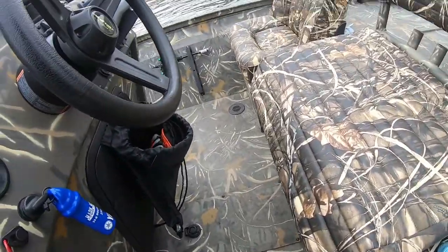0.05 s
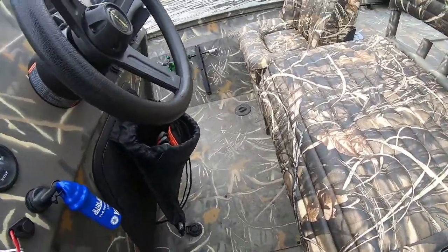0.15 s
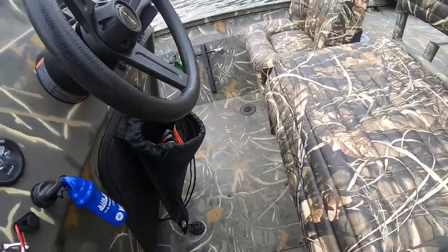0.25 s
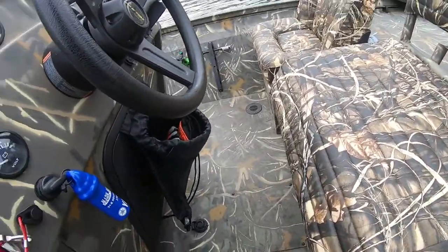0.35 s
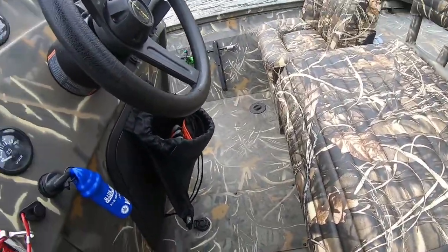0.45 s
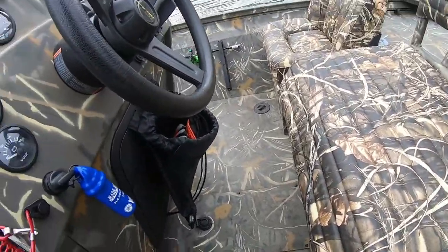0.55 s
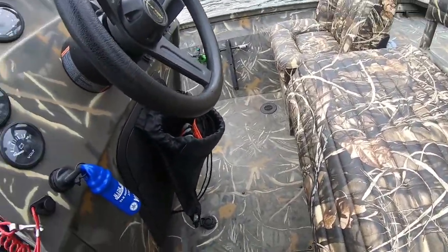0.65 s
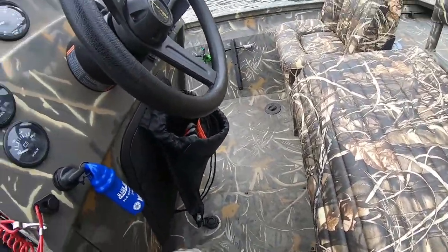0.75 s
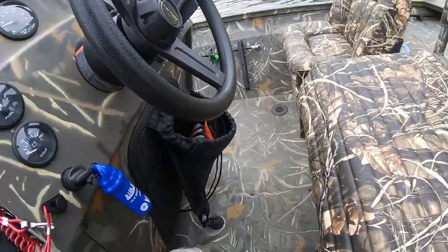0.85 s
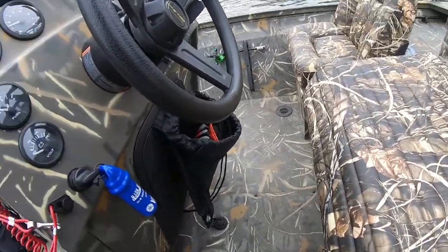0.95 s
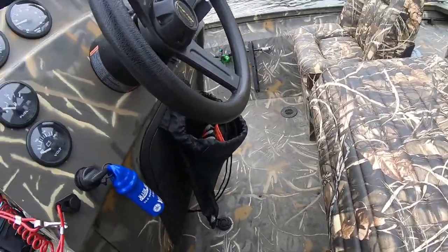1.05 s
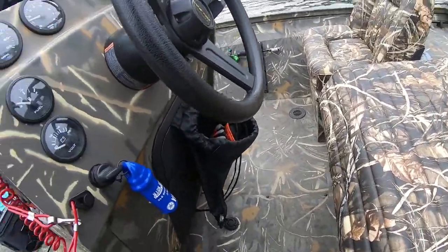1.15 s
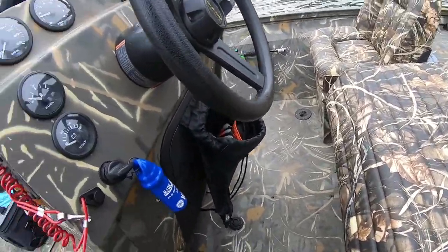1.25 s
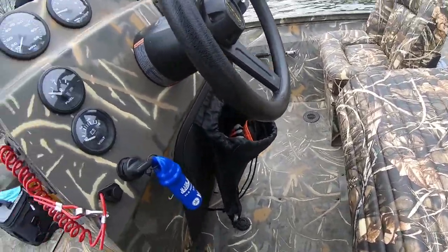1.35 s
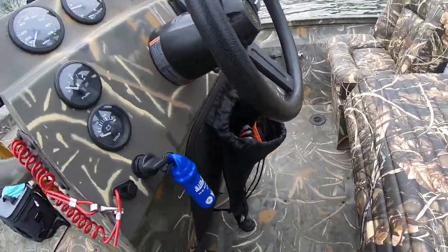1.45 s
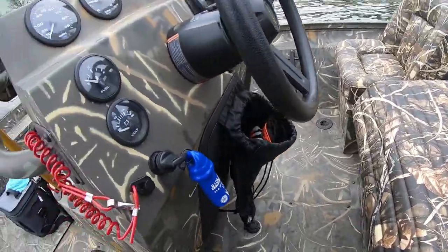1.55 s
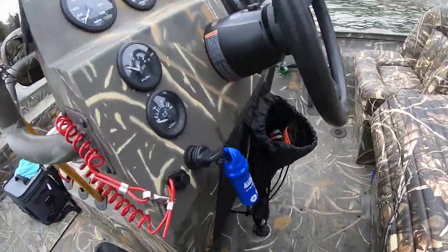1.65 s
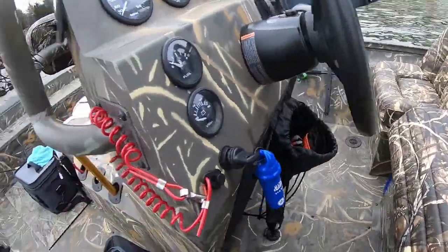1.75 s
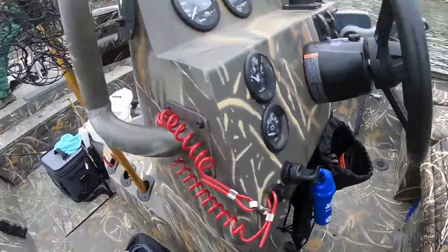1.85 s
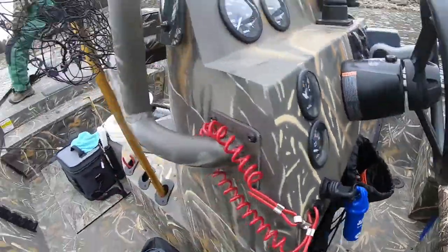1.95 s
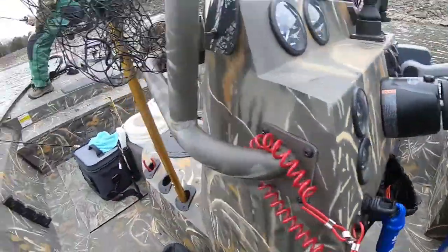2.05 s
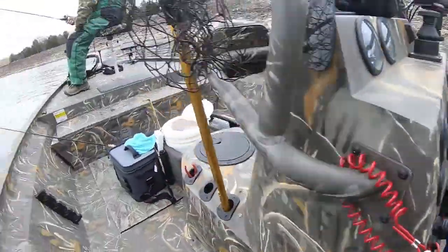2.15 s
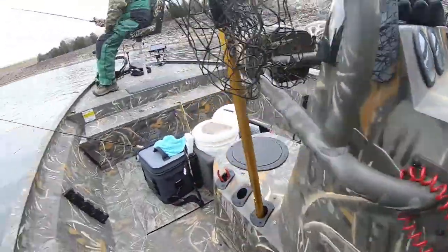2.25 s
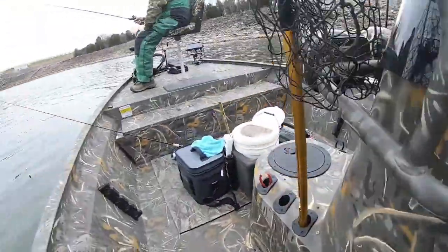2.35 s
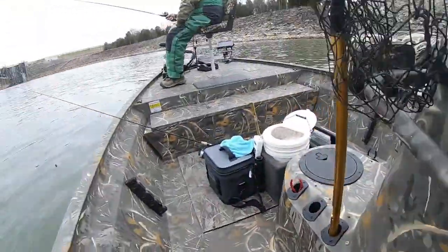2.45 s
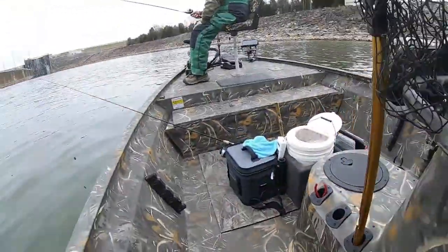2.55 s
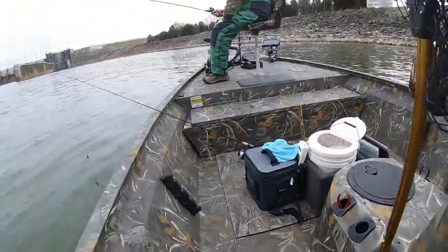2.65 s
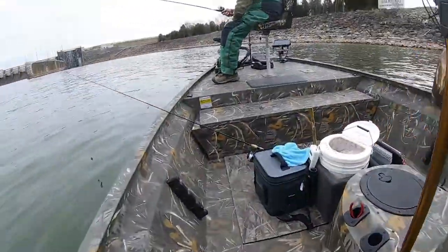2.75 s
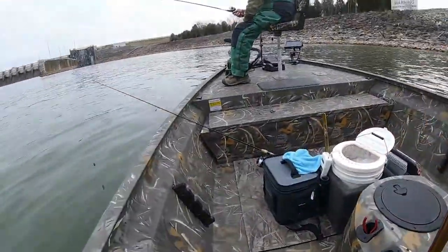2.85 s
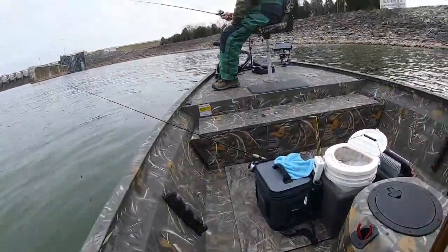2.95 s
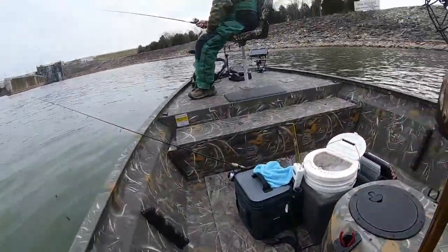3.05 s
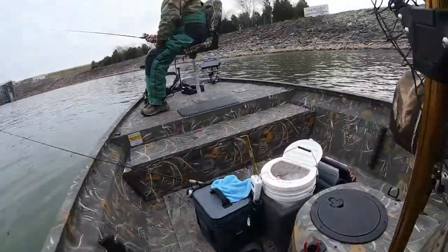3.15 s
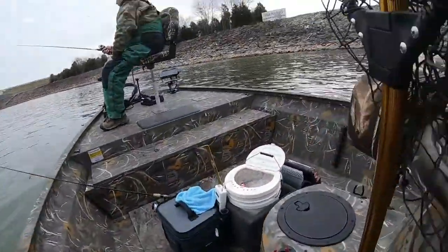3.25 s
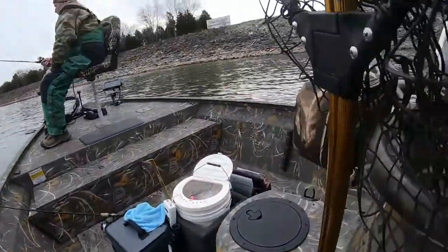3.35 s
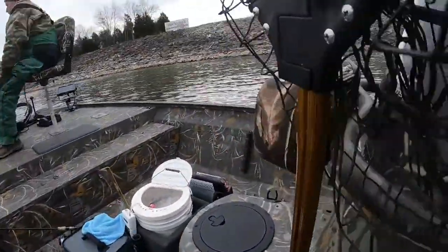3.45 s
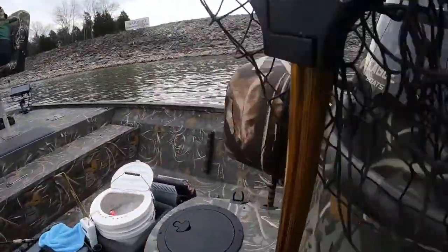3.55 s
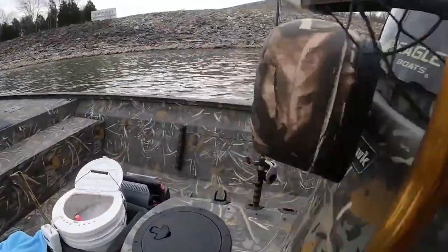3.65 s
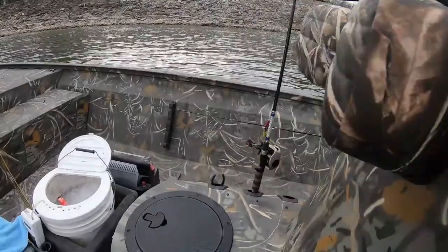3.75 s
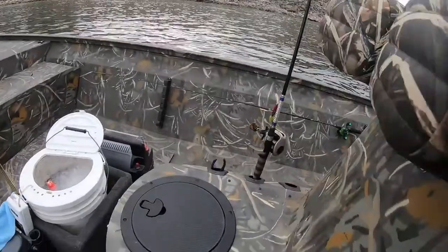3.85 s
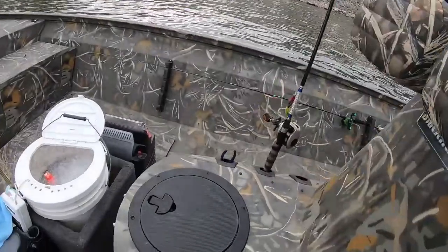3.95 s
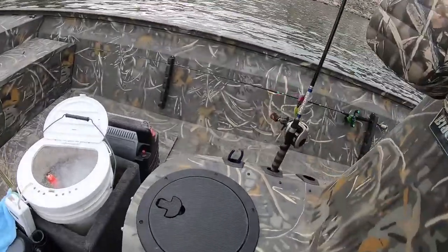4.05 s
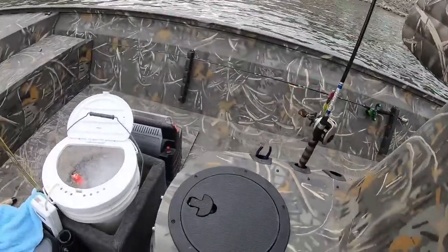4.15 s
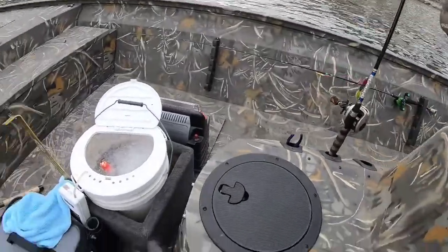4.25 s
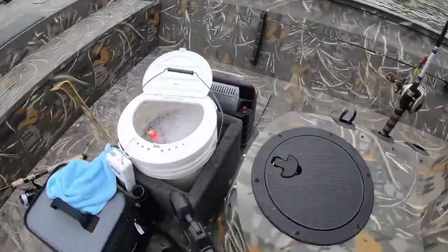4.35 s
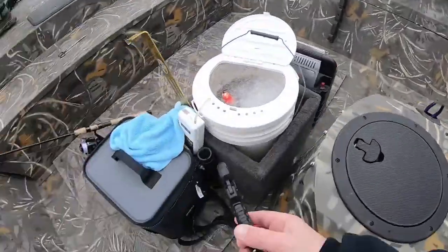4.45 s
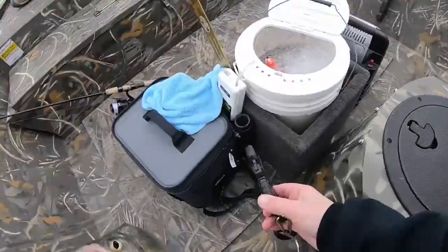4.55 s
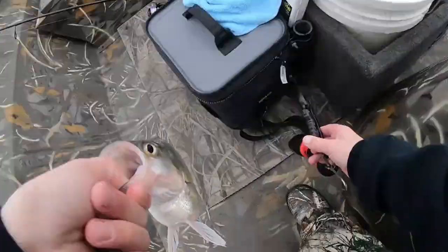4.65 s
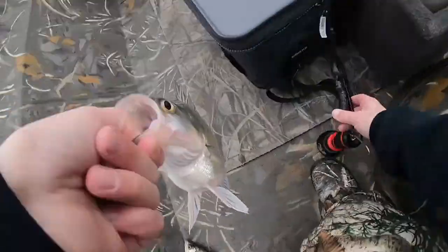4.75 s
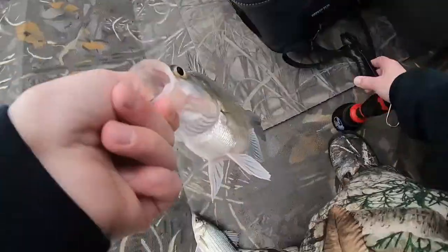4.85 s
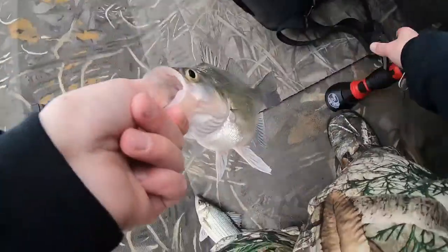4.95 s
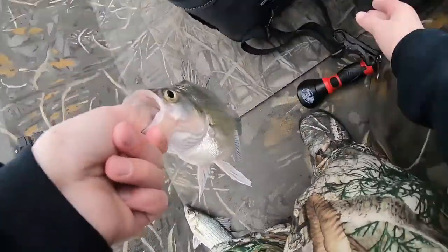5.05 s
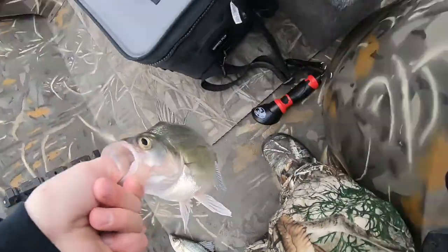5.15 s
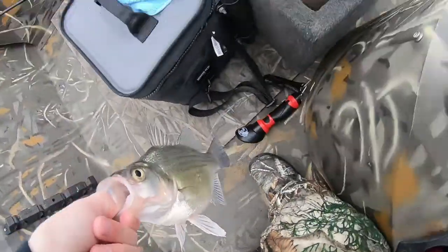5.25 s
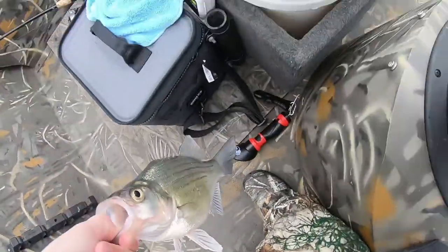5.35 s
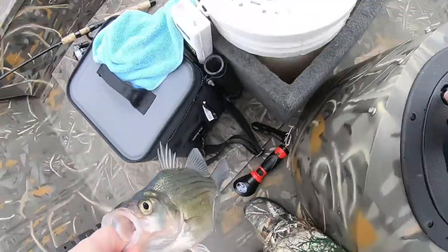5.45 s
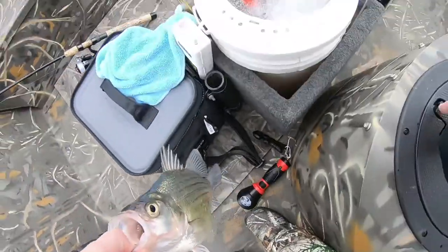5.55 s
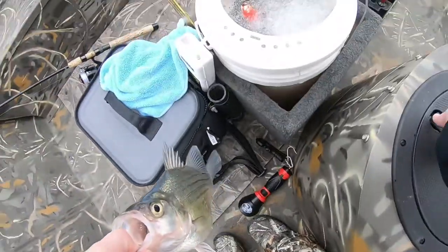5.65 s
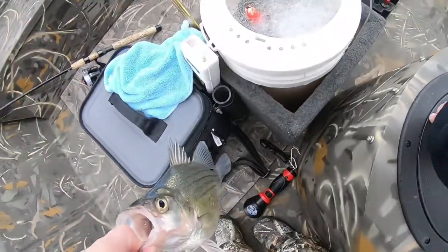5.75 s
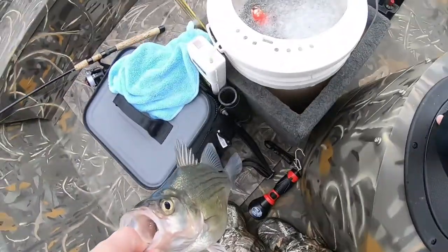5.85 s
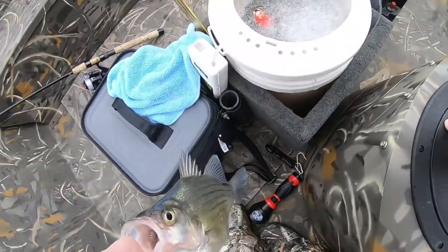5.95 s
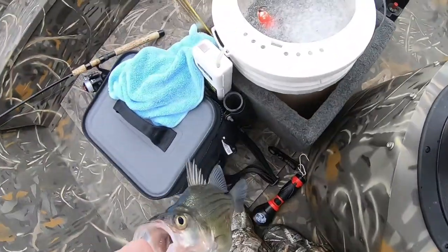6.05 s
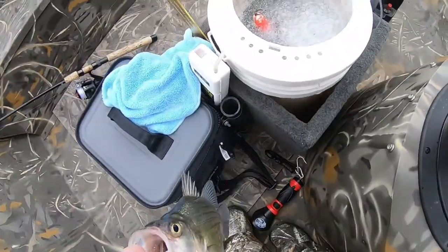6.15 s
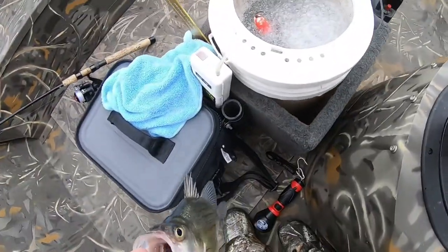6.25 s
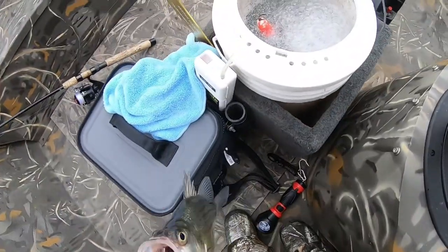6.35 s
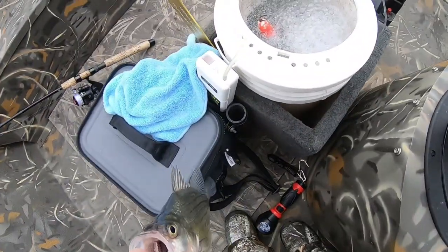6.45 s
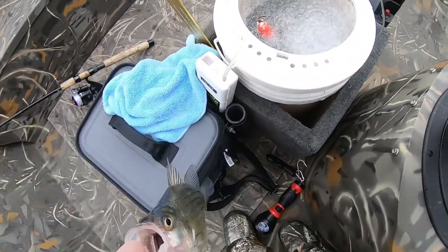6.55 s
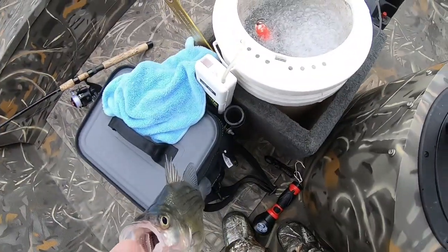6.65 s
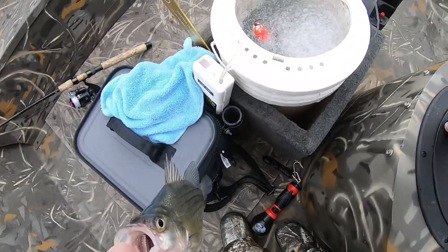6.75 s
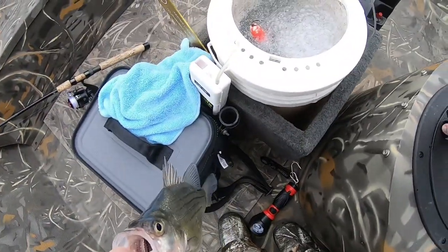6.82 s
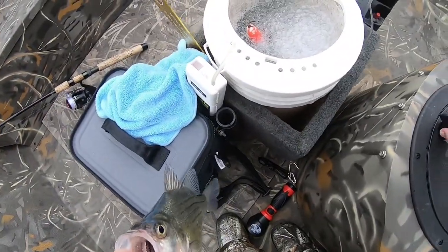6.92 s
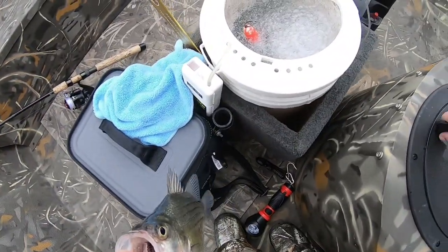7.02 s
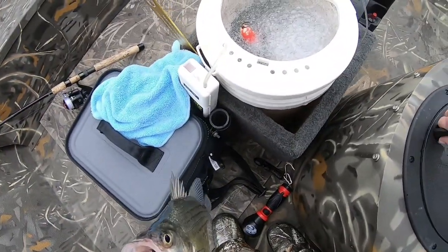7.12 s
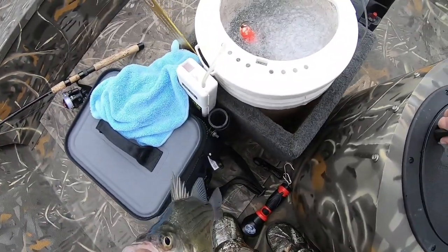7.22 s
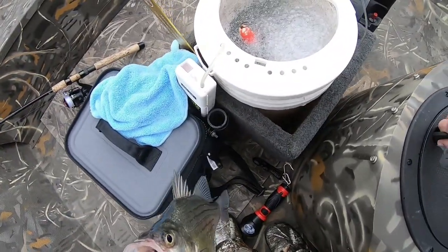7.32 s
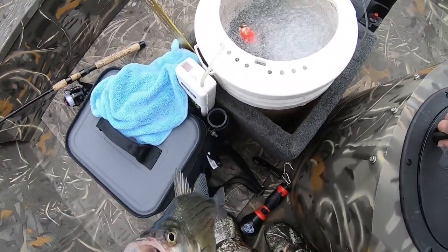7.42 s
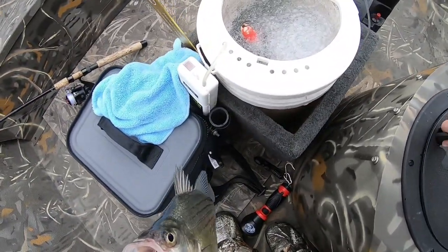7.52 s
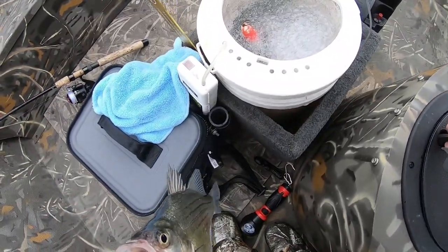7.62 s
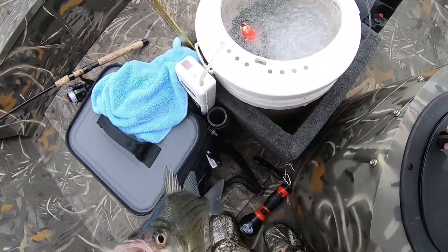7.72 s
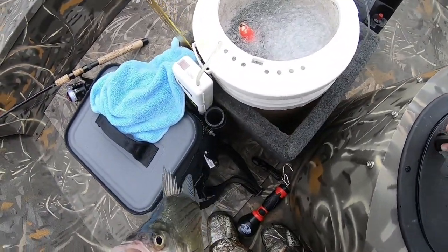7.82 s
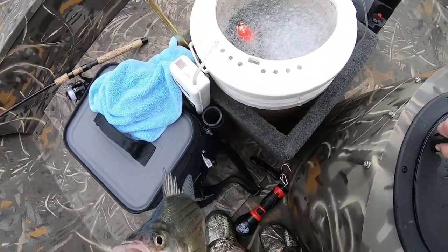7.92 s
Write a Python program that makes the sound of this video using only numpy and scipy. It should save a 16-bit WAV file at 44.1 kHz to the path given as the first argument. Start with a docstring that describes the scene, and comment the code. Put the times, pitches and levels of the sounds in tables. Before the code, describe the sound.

Close chest-worn microphone in an open aluminium boat on calm water. Low lapping and soft hiss continue throughout. A few light clicks and a sharp knock come first, then quieter moments with dull hull thumps. Mid-way, gear clacks and lands with a heavy booming clatter and a run of rattles, then small knocks fade as a bait-bucket air pump buzzes steadily.

```python
"""An aluminium boat on calm water, with fishing tackle picked up, knocked and dropped near a chest microphone.
Filtered noise makes lapping water and a background hiss; an air pump ticks at the bait bucket through resonances.
Clothing rustles in grains of noise, and the hull booms under feet and gear with dying tones and noise.
Short bands of noise add rings, low thumps and dull knocks; noise bursts through resonances make the clicks
and rattles of tackle. Once, the level dips for an instant."""
import sys
import numpy as np
from scipy import signal
from scipy.fft import rfft, irfft, next_fast_len
from scipy.io import wavfile
from scipy.ndimage import uniform_filter1d, map_coordinates

SR = 44100
rng = np.random.default_rng(int(sys.argv[2]) if len(sys.argv) > 2 else 0)


def log_audio(samples):
    """Write samples as a 16-bit WAV file to the path given in sys.argv[1]."""
    # one column per channel
    frames = np.atleast_2d(samples).T
    # limit to full scale, then quantise
    limited = np.clip(frames, -1, 1)
    pcm = np.round(limited * 32767).astype(np.int16)
    wavfile.write(sys.argv[1], SR, pcm)


N = 351918

# resonances of hollow plastic and metal parts: (centre [Hz], width [Hz], strength [dB])
TACKLE_MODES = [(847, 570, -2), (1460, 335, 6), (2260, 910, -4.5), (3230, 114, 1.5), (3630, 960, -11.5),
                (4700, 380, 0.5), (6100, 1800, -11.5), (6610, 99, 1), (11100, 54, -20), (14100, 120, -18)]


def amp(db):
    """Amplitude factor of a level in dB."""
    return 10 ** (np.asarray(db) / 20)


def unit(x):
    """Scale a signal to an rms of 1."""
    return x / np.sqrt(np.mean(x ** 2) + 1e-20)


def along(points, hz):
    """Read (frequency [Hz], value) points on a log frequency axis."""
    point_hz, values = np.transpose(points)
    return np.interp(np.log(hz + 1), np.log(point_hz + 1), values)


def curves(rows):
    """One value per sample for each column after the time."""
    times, *columns = np.transpose(rows)
    return [np.interp(np.arange(N) / SR, times, column) for column in columns]


def wobble(rate):
    """A smooth random curve through `rate` random knots a second."""
    knots = rng.standard_normal(int(N * rate / SR) + 4)
    return map_coordinates(knots, [np.arange(N) * rate / SR])


def filtered(x, response):
    """Multiply the spectrum of x by a response of frequency."""
    size = next_fast_len(x.shape[-1] + 8192)  # room for the ringing
    spectrum = rfft(x, size) * response(np.fft.rfftfreq(size, 1 / SR))
    return irfft(spectrum, size)[..., :x.shape[-1]]


def resonant(modes):
    """Causal response of (centre [Hz], width [Hz], strength [dB]) resonances in alternating sign."""
    def response(f):
        return sum((-1) ** k * amp(db) * 1j * f * width / (centre * centre - f * f + 1j * f * width)
                   for k, (centre, width, db) in enumerate(modes))
    return response


def rush(spectrum, patchy_db=0.):
    """Coloured noise of rms 1, with patches of random gain in time and frequency."""
    cells = signal.stft(rng.standard_normal(N), nperseg=512)[2]
    field = uniform_filter1d(rng.standard_normal(cells.shape), 6, 0)
    field = uniform_filter1d(field, 12, 1)
    noise = signal.istft(cells * amp(patchy_db * unit(field)), nperseg=512)[1][:N]
    return unit(filtered(noise, lambda hz: amp(along(spectrum, hz))))


def add(track, s, sound):
    """Mix a sound into the track from time s [s]."""
    part = track[round(s * SR):][:len(sound)]
    part += sound[:len(part)]


def dying(t, t60, attack):
    """Envelope of a blow: a rise over `attack` [s], then a fall of 60 dB in t60 [s]."""
    return amp(-60 * t / max(t60, .004)) * (1 - np.exp(-t / attack))


def background():
    """Wavelets drum on the hull in lumps; wash is smoother, under a hiss and a top treble that rise and fall."""
    # background levels: (time [s], low rumble [dB], hiss [dB], top treble hiss [dB])
    background_levels = [(0, -46, -67, -71), (.24, -41, -64, -68), (.45, -47.5, -71.5, -80),
                         (.91, -49, -69.5, -74), (1.18, -43, -71, -84), (1.69, -44.5, -66.5, -82),
                         (2.02, -38.5, -67, -66), (2.35, -48.5, -63, -63.5), (2.5, -42, -71, -76),
                         (2.8, -42, -61.5, -70), (3.13, -41.5, -60.5, -65), (3.4, -44.5, -67.5, -76),
                         (3.8, -55.5, -65, -71.5), (4.1, -44.5, -67, -69.5), (4.7, -47, -52.5, -56.5),
                         (5.27, -49, -64.5, -72.5), (5.87, -43.5, -68.5, -77), (6.5, -43, -67.5, -71),
                         (7.1, -45, -66.5, -71), (7.7, -42.5, -68, -80), (7.98, -40, -60.5, -68)]
    # wash along the boat: (time [s], level [dB])
    wash_levels = [(0, -51.5), (1.2, -54), (1.8, -51), (3.3, -49), (4, -50.5), (4.65, -43.5), (5.3, -50),
                   (7.98, -50)]
    # relative spectra of rumble, wash and hiss: (frequency [Hz], density [dB per Hz])
    rumble_spectrum = [(15, -37.5), (30, -2), (62, -0.5), (84, 5), (105, 1), (135, 1), (220, -4.5),
                       (320, -25), (500, -61.5)]
    wash_spectrum = [(120, -15.5), (260, 0.5), (450, -2), (700, -8.5), (1100, -12), (2000, -17),
                     (2700, -33.5), (4000, -59)]
    hiss_spectrum = [(1200, -48.5), (2400, 3.5), (3400, -4), (4000, 1.5), (6300, -5.5), (7500, -9.5),
                     (10000, -1.5), (11500, -7), (12500, -49.5)]
    top_spectrum = [(10500, -45.5), (11800, 2), (14000, -2.5), (16000, -7)]

    rumble_db, hiss_db, top_db = curves(background_levels)
    lumps = amp(2.7 * wobble(9) + 1.4 * wobble(2.916))
    rumble = amp(rumble_db) * unit(lumps * rush(rumble_spectrum))
    wash = amp(curves(wash_levels)[0]) * rush(wash_spectrum, patchy_db=1.2)
    hiss = amp(hiss_db) * rush(hiss_spectrum, patchy_db=2.5)
    top = amp(top_db + 1.5 * wobble(5)) * rush(top_spectrum, patchy_db=2.0)
    return rumble + wash + hiss + top


def pump():
    """The piston knocks the case twice a stroke, giving steady lines; the valve snaps shut with a puff of noise."""
    # pump speed: (time [s], rate [strokes per s])
    stroke_rates = [(0, 30.4), (2.5, 30.47), (4.2, 30.38), (5.5, 30.38), (6.65, 30.23), (7.98, 30.55)]
    # louder as the microphone nears: (time [s], knock level [dB], valve tick level [dB])
    pump_levels = [(0, -76, -75.5), (2, -58.5, -68), (4, -56, -70.5), (5.2, -51.5, -66.5),
                   (7.98, -52.5, -66)]
    # pump case and bucket: (centre [Hz], width [Hz], strength [dB])
    bucket_modes = [(303, 25, -4), (380, 35, -5), (485, 22, 0), (574, 22, -3), (850, 16, -9), (941, 12, -3),
                    (1001, 12, -4)]
    # relative spectrum of the valve's puff: (frequency [Hz], density [dB per Hz])
    puff_spectrum = [(900, -16.5), (2000, 7.5), (2700, 0), (3400, -11), (4200, -2.5), (6500, -18.5),
                     (8000, -51)]
    snap_modes = [(2430, 490, -4), (3830, 250, 3.5), (6200, 420, -5.5)]

    turns = .08 + np.cumsum(curves(stroke_rates)[0]) / SR
    knock_db, tick_db = curves(pump_levels)

    def beat(early):
        """One pulse a stroke, `early` strokes ahead, of slightly uneven strength."""
        return np.diff(np.floor(turns + early), prepend=0) * amp(.8 * wobble(25))

    knocks = .8 * beat(.04) + beat(.04 + 3 / 8)
    case = unit(filtered(knocks, resonant(bucket_modes)))
    snap = unit(filtered(beat(.07), resonant(snap_modes)))
    breath = np.exp(1.4 * (np.cos(2 * np.pi * turns) - 1))  # swells once a stroke
    puff = unit(breath * rush(puff_spectrum))
    return amp(knock_db) * case + amp(tick_db) * (0.5 * snap + 0.84 * puff)


def rustle():
    """Friction comes in grains: noise under a spiky random envelope, coloured by the parts that rub."""
    # strokes of rubbing cloth and gear:
    # (time [s], length [s], level [dB], change by the end [dB], bright part relative to body [dB])
    strokes = [(0.245, 0.17, -56, -11, -9), (0.68, 0.062, -65, -7, -4), (0.773, 0.074, -60.5, 4, -7),
               (0.959, 0.138, -48.5, -9, -8), (1.713, .08, -60, -11, -6), (2.516, 0.079, -57, -12, -6),
               (3.176, 0.12, -57, 4.5, -11), (4.041, 0.28, -47, -17, -9), (4.64, 0.13, -38, -16, 0.5),
               (4.867, 0.16, -51, 17, -1.5), (5.007, 0.18, -51.5, -12, 0), (5.446, 0.13, -62, 0, -23),
               (5.813, 0.044, -69, -4, -4)]
    # relative spectra of the cloth and of the bright rubbing: (frequency [Hz], density [dB per Hz])
    cloth_spectrum = [(300, -30), (900, 1), (2000, -2), (4300, -1.5), (7000, -5.5), (10000, -42)]
    sheen_spectrum = [(5000, -16), (8000, -2.5), (12700, -5), (16500, -15)]
    swell_s = .008  # smooths the ends of each stroke

    level_db, bright_db = np.full(N, -120.), np.zeros(N)
    for s, length, db, change_db, bright in strokes:
        stroke = slice(round(s * SR), round((s + length) * SR))
        level_db[stroke] = np.linspace(db, db + change_db, stroke.stop - stroke.start)
        bright_db[stroke] = bright
    cloth = rush(cloth_spectrum, patchy_db=2.5)
    body = unit(filtered(cloth, lambda f: 0.58 + resonant(TACKLE_MODES)(f)))
    spikes = unit(amp(2.8 * wobble(180)))
    grains = (body + amp(bright_db) * rush(sheen_spectrum)) * spikes
    return uniform_filter1d(amp(level_db), size=round(swell_s * SR)) * grains


def short_bands():
    """Short bands of noise, narrow or broad, swell quickly and fade: rings, low thumps and dull knocks."""
    # short bands of noise, some very high:
    # (time [s], strength [dB], centre [Hz], width before narrowing [Hz], time scale [s])
    noise_bands = [(0.258, -37.5, 3800, 200, 0.041), (0.371, -33, 4450, 200, 0.009),
                   (0.366, -37.5, 1670, 300, 0.025), (.715, -41, 1680, 120, 0.08),
                   (0.78, -41, 885, 100, 0.045), (0.808, -30, 1850, 220, 0.053),
                   (.807, -39.5, 2730, 250, 0.038), (0.989, -13, 930, 139, 0.015),
                   (0.996, -36, 13200, 150, .038), (1.019, -32, 1870, 148, 0.036),
                   (1.034, -32.5, 1584, 150, 0.032), (1.81, -36.5, 1300, 500, .03),
                   (3.19, -29, 1220, 760, 0.08), (3.265, -27, 830, 740, 0.035),
                   (4.176, -28.5, 1053, 149, 0.036), (4.19, -43, 13500, 150, 0.078),
                   (4.23, -21, 610, 400, 0.0086), (4.653, -15.5, 967, 200, 0.065),
                   (4.656, -13.5, 86.3, 35, 0.21), (4.66, -22, 496, 400, 0.027),
                   (4.902, -12.5, 1390, 900, 0.051), (4.943, -8.5, 664, 500, 0.028),
                   (5.018, -20.5, 680, 500, 0.028), (5.12, -37, 12830, 200, 0.052),
                   (5.651, -24, 208, 60, 0.028), (6.053, -42.5, 4620, 600, 0.025)]

    out = np.zeros(N)
    for s, db, hz, width, length in noise_bands:
        u = np.arange(SR // 4) / SR / length
        noise = rng.standard_normal(len(u))
        band = filtered(noise, lambda f: resonant([(hz, width, 0)])(f) ** 2)  # squared: narrower
        add(out, s, amp(db) * unit(band) * u * np.exp(-3.2 * u ** 2))
    return out


def thumps():
    """One panel rings out at its pitch over the dense boom of the hull; the whole boat heaves when weight shifts."""
    # blows on deck and hull:
    # (time [s], panel strength [dB], panel pitch [Hz], boom t60 [s], boom relative to panel [dB])
    blows = [(0.989, -33.5, 131.6, 0.41, -8), (1.305, -31, 73, 0.22, -11), (1.81, -37.5, 116.6, 0.51, -4.5),
             (2.334, -28.5, 83.3, 0.58, -12.5), (2.565, -21, 119, 0.34, -8), (2.657, -31, 86.1, 0.43, -9),
             (3.215, -13, 352, 0.076, -11.5), (3.272, -27, 290, 0.17, -7), (3.501, -9, 146, 0.055, -4),
             (3.518, -12.5, 131, 0.19, -20), (3.552, -9.5, 165.6, 0.2, -10.5),
             (3.598, -31, 174.4, 0.88, -5.5), (4.058, -32, 137, 0.19, -2.5), (4.18, -21.5, 175, 0.09, -7),
             (4.222, -34, 190, 0.19, 3), (4.506, -26, 393, 0.17, 1), (4.577, -24.5, 98, 0.42, -6),
             (4.656, -2, 172, 0.085, -4.5), (4.685, -15, 127, 0.1, 0), (4.709, -10, 127, 0.16, -4),
             (4.734, -19, 127, 0.16, -9.5), (4.758, -23.5, 125.3, 0.54, -11.5),
             (4.864, -27.5, 123, 0.39, -3), (4.95, -13.5, 351, 0.18, -4), (5.024, -31.5, 303, 0.32, -6.5),
             (5.478, -22, 180, 0.12, -1), (5.52, -30, 172, 0.25, -16), (5.569, -29.5, 204, 0.51, -13.5),
             (5.633, -29.5, 205, 0.08, 3), (5.84, -27.5, 115, 0.17, -8.5), (6.07, -28, 171, 0.23, -6),
             (7.393, -28.5, 168, 0.2, -8), (7.519, -27.5, 200, 0.087, -7)]
    # weight shifts in the boat: (time [s], strength [dB])
    heaves = [(.989, -38.5), (1.598, -44), (2.565, -42), (3.5, -18.5), (3.552, -38), (4.059, -35),
              (4.18, -44), (4.657, -39), (5.024, -50), (5.842, -34), (7.519, -43), (7.9, -42)]
    # relative spectrum of the hull's boom: (frequency [Hz], density [dB per Hz])
    hull_spectrum = [(45, -50), (80, -1), (135, -0.5), (230, 2), (350, -8), (550, -18.5), (900, -44.5),
                     (2000, -60)]
    low_cut_hz = 55  # low cut for panels and boom together

    out, t = np.zeros(N), np.arange(SR * 2 // 5) / SR
    hull_noise = rush(hull_spectrum)
    for s, db, hz, t60, boom_db in blows:
        panel = np.sin(2 * np.pi * hz * t) * dying(t, 0.71 * t60, 0.0012)  # dies before the boom
        boom = hull_noise[round(s * SR):][:len(t)] * dying(t, t60, 0.0028)
        add(out, s, amp(db) * (panel + amp(boom_db) * boom))
    out = filtered(out, lambda f: (1j * f / (low_cut_hz + 1j * f)) ** 2)
    for s, db in heaves:
        add(out, s, amp(db) * np.sin(2 * np.pi * 60 * t) * dying(t, .35, .01))
    return out


def clicks():
    """A sharp crack and a rattling tail excite the tackle's resonances, at new strengths for each row."""
    # clicks and rattles, one a faint rattle just before a loud click: (time [s],
    # level of the first 5 ms [dB], centre [Hz], share of top treble [dB], share of rattle [dB])
    click_rows = [(0.2707, -32.5, 2580, -22, 1), (0.3735, -54, 4370, -36, -3), (0.495, -60, 4460, -24, -9),
                  (0.5375, -53, 4400, -17, -3), (0.551, -49, 4400, -15, -13), (0.6955, -47, 2310, -45, 8.5),
                  (0.757, -62, 5000, -30, -9), (0.8294, -56, 3640, -40, -4), (0.961, -50.5, 3820, -19, 21),
                  (0.9918, -16.5, 4500, -34, -12.5), (1.025, -61, 6500, -20, -9),
                  (1.7505, -39.5, 5800, -40, -0.5), (1.997, -59, 4650, -18, 4), (2.39, -49, 2170, -29, -15),
                  (2.545, -38, 6720, -7, 1.5), (2.583, -41, 2600, -3.5, 0), (3.185, -54, 3540, -17, -5),
                  (3.2057, -50, 2800, -24, 15), (3.2718, -63, 2800, -26, -5), (3.502, -59, 700, -40, -4.5),
                  (3.551, -51, 700, -42, 0.5), (3.619, -52, 2180, -23, 3), (4.0624, -12, 3980, -1.5, -8),
                  (4.146, -43, 2510, -17, 6), (4.1796, -33.5, 3650, -15, 7),
                  (4.232, -46.5, 2240, -12, 15.5), (4.504, -44.5, 900, -26, -2),
                  (4.655, -20.5, 4400, -13.5, 0.5), (4.6892, -24.5, 4400, -4.5, 0),
                  (4.71, -29.5, 2850, 0, 2), (4.7314, -34, 4500, -9, -9), (4.751, -47.5, 4740, -21, -15),
                  (4.7694, -42, 4400, -10, -8), (4.7906, -37.5, 4560, -9, -8),
                  (4.808, -31.5, 4470, -7, -32), (4.8661, -33.5, 2500, -24, -1),
                  (4.9074, -28, 5500, -17, 22), (4.921, -29, 2960, -10, 7), (4.951, -19, 2400, -18, 0),
                  (4.9699, -32, 3730, -22, -20), (4.997, -26.5, 3100, -38, -8),
                  (5.023, -35, 3700, -11, -16), (5.0464, -47.5, 5820, -29, 8), (5.1068, -44, 3330, -1, -8),
                  (5.16, -32.5, 7250, -3.5, 5), (5.1833, -40, 3250, -22, -5), (5.499, -40.5, 4130, -55, -5),
                  (5.75, -49, 2120, -32, 1), (5.832, -48.5, 5640, -32.5, 2), (5.8425, -41, 3930, -39, -5.5),
                  (6.0656, -54.5, 4440, -38, 9)]
    rattle_t60_s = 0.098

    out, t = np.zeros(N), np.arange(SR // 4) / SR
    rattle = unit(amp(4.5 * wobble(250)) * rng.standard_normal(N))
    for s, db, hz, top_db, rattle_db in click_rows:
        crack = rng.standard_normal(len(t)) * dying(t, .012, .0012) * 6
        tail = amp(rattle_db) * rattle[round(s * SR):][:len(t)] * dying(t, rattle_t60_s, 0.0025)
        # only the strength column varies
        modes = np.array(TACKLE_MODES) + [0, 0, 1] * rng.normal(0, 1.1, (len(TACKLE_MODES), 1))

        def response(f):
            """Resonances weighted around the centre, plus the top treble."""
            octaves = np.abs(np.log2((f + 50) / hz))
            focus = amp(-5.5 * octaves ** 1.18) * (0.29 + resonant(modes)(f))
            return focus + amp(top_db) / (1 + (9000 / (f + 1)) ** 8)

        sound = filtered(crack + tail, response)
        first_rms = np.sqrt(np.mean(sound[:SR // 200] ** 2))
        add(out, s, amp(db) * sound / first_rms)
    return out


def scene():
    """Everything heard in the boat adds up, the same for both microphone ports."""
    deck = background() + pump() + rustle() + short_bands() + thumps() + clicks()
    return np.array([deck, deck])


def record(dry):
    """Two microphone ports hear the same but for the shortest wavelengths; the level of both dips once."""
    # colour of the microphone housing: (frequency [Hz], gain [dB])
    housing_colour = [(20, 1.5), (6500, -2), (8500, -9), (10300, -20.5), (11000, -25), (11700, -15.5),
                      (13000, -6.5), (15600, -19.5), (16300, -38)]
    # brief dip in level: (start [s], end [s])
    dip_span = (5.795, 5.8165)
    port_difference = [(400, -81), (1000, -73.0), (6000, -26.5), (10900, -16), (11500, 3.0), (16000, -2.0)]
    top_hz = 16600  # nothing passes from here up

    mid = filtered(dry[0], lambda hz: amp(along(housing_colour, hz)))
    wander = .3 + .95 * unit(wobble(60))  # the treble wanders between the ports
    side = filtered(mid * wander, lambda hz: amp(along(port_difference, hz)))
    t = np.arange(N) / SR
    dipped = (t > dip_span[0]) & (t < dip_span[1])
    gate = uniform_filter1d(np.where(dipped, amp(-37), 1.), size=40)
    return filtered(gate * np.array([mid + side, mid - side]), lambda hz: hz < top_hz)


dry = scene()
out = record(dry)
log_audio(out)
```